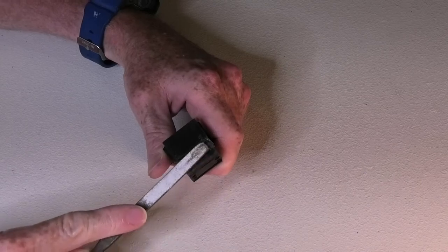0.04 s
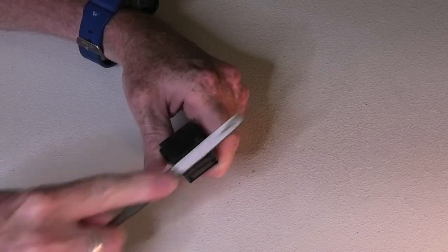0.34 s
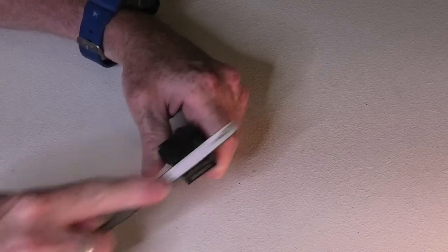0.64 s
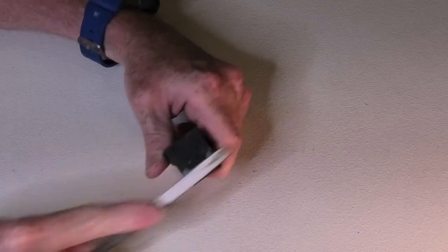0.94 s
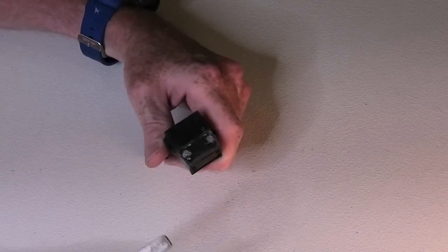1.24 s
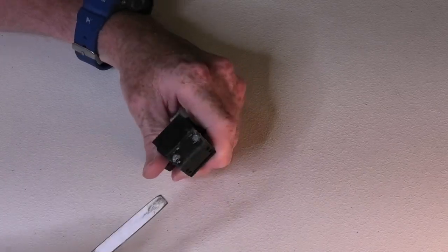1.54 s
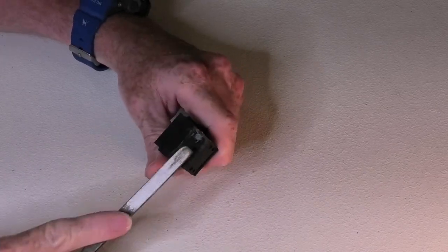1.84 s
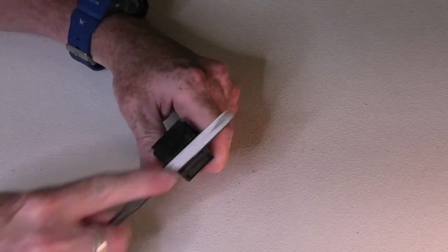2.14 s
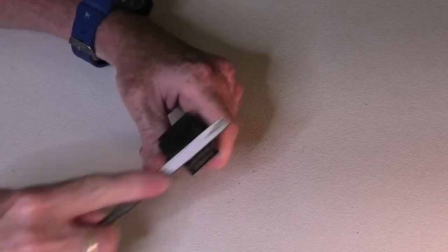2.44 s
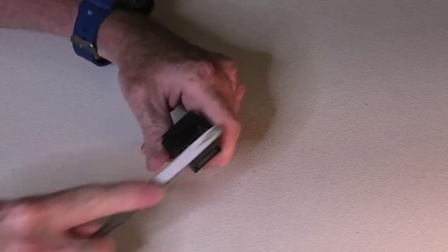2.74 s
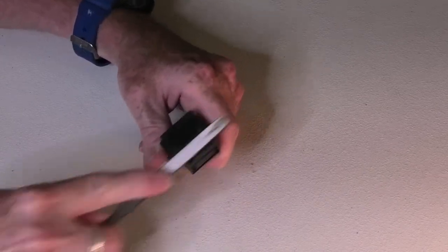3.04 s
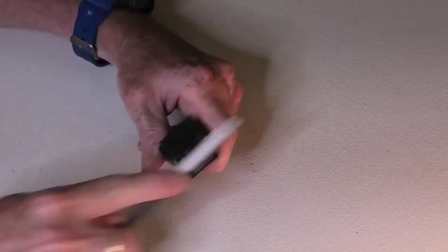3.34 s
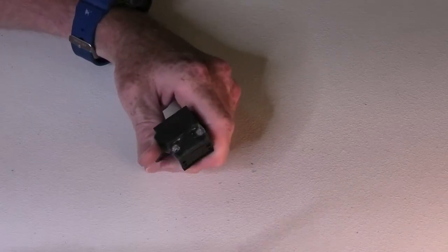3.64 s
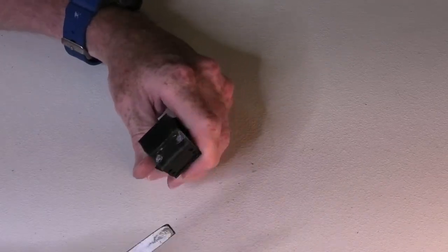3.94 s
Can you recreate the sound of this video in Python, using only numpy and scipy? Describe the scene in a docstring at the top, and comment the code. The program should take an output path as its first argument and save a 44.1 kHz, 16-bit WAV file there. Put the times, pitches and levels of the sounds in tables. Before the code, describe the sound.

Quick, scratchy file strokes on a plastic part, pausing once, with a few sharp clicks.

```python
"""Filing a plastic block

A flat metal file is worked back and forth over a small hand-held plastic block, in two bouts.
Its teeth catch at a rate that follows stroke speed, drive the resonances of block and blade and tear
off hissing chips. Now and then it knocks, and once it zips off the edge. The hand bumps the table,
the camera mount sways below hearing, and a distant engine drones through the small room's walls."""
import sys
import numpy as np
from scipy import signal
from scipy.fft import rfft, irfft, next_fast_len
from scipy.io import wavfile
from scipy.ndimage import uniform_filter1d

SR = 44100
rng = np.random.default_rng(int(sys.argv[2]) if len(sys.argv) > 2 else 0)


def wav_out(sig):
    """Save sig, one row per channel (or a flat mono array), as 16-bit PCM at SR to the path in sys.argv[1]."""
    wavfile.write(sys.argv[1], SR, np.round(np.clip(np.atleast_2d(sig).T, -1, 1) * 32767).astype(np.int16))


N = 176400

# file strokes: start_s, length_s, ring_db, hollow_db, hiss_db, buzz_db, top_tooth_hz, tilt_db_per_octave
FILE_STROKES = [(0.176, 0.15, -41, -49.5, -46, -42.5, 2696, -6),
                (0.373, 0.1, -34.5, -50, -39, -36, 2605, 3), (0.509, 0.095, -31, -55, -40, -32, 2942, -5),
                (0.662, 0.092, -31.5, -46, -34.5, -32.5, 2554, 3.5),
                (0.804, 0.098, -36.5, -49, -42.5, -38.5, 2905, -2),
                (0.95, 0.084, -44, -44, -45, -44, 1485, 3), (0.986, 0.09, -46.5, -51, -41, -52, 1505, -1),
                (2.107, 0.16, -49.5, -52.5, -47.5, -45, 2596, -11),
                (2.324, 0.099, -48, -39, -50.5, -40, 1478, -8),
                (2.468, 0.093, -44.5, -46, -45, -41, 2860, -6),
                (2.619, .1, -38.5, -45, -41.5, -42, 2201, -4),
                (2.785, 0.096, -41, -61, -42.5, -42.5, 2843, 10),
                (2.922, 0.1, -43.5, -43, -45, -41, 1702, -6), (3.064, 0.11, -46, -64, -41, -46, 2800, -7),
                (3.209, 0.1, -37, -47.5, -37, -37.5, 2408, 12),
                (3.353, 0.11, -39.5, -59, -35, -42.5, 2694, 5)]
# the file leaving the edge: time_s, tooth_rate_hz, level_db
EDGE_GLIDE = [(.958, 430, -52), (0.970, 720, -35), (.978, 900, -30), (.992, 1450, -33), (1.009, 1753, -39),
              (1.028, 3000, -35), (1.040, 3100, -46)]
# file striking block: start_s, level_db, pitch_hz, decay_s, relative_crack_db
FILE_KNOCKS = [(0.0275, -21, 2140, 0.00029, -11), (0.0855, -25, 1980, 0.00037, -23),
               (0.5147, -18, 2740, 0.0012, -25), (0.667, -22, 2650, 0.0008, -18),
               (1.0431, -23, 2700, 0.0013, 1.5), (1.059, -32, 910, 0.0021, -11),
               (1.9733, -28, 2500, 0.00034, -23), (2.576, -40, 560, .005, -25),
               (2.6408, -15, 2480, 0.0006, -13.5), (2.7955, -29, 1340, 0.0013, -20),
               (3.086, -28, 2300, 0.0014, -5), (3.2301, -5.5, 2610, 0.00089, -20),
               (3.368, -25.5, 2550, 0.0017, -21), (3.476, -39, 860, 0.0013, -26),
               (3.5007, -34, 2950, 0.0062, -12), (3.5216, -35, 1380, 0.0013, -37),
               (3.615, -55, 6530, 0.0015, 6)]
# hand striking table: start_s, level_db, pitch_hz, decay_s
TABLE_BUMPS = [(0.816, -29, 76, 0.018), (1.233, -43, 230, 0.0098), (2.79, -30.5, 127, 0.014),
               (3.426, -19.5, 89, 0.014), (3.472, -22, 92, .03), (3.486, -15, 186.5, 0.0047),
               (3.489, -35.5, 354, 0.0087), (3.505, -24.5, 86, 0.025)]
# light rubbing of file and fingers: start_s, length_s, level_db
LIGHT_RUBS = [(1.037, 0.057, -47), (1.23, 0.061, -61), (1.679, 0.34, -65), (3.425, 0.13, -55.5),
              (3.622, 0.024, -52.5), (3.82, 0.78, -47.5)]
# modes of the block's high ring, its hollow body and the steel blade: pitch_hz, bandwidth_hz, gain_db
RING_MODES = [(1875, 172, -3.5), (2230, 186, -6.5), (2720, 214, -1), (2883, 190, 1), (3210, 230, -13.5)]
HOLLOW_MODES = [(620, 570, -8), (852, 150, 6.5), (1280, 260, -1.5), (1465, 580, 9.5), (1634, 530, 13)]
BLADE_MODES = [(3260, 56, 6.5), (4230, 84, 11), (4470, 94, 5.5), (5800, 340, 1.5), (6970, 58, 1.5),
               (7410, 90, 4), (8600, 72, -7), (8480, 30, -0.5), (10100, 50, -3)]
# engine speed and load: time_s, firing_hz, drone_db, tilt_db_per_octave
ENGINE_LOAD = [(0, 37.4, 0, -9), (.48, 37.5, 0, -9), (.75, 40, -3, -3), (1.02, 43.3, -5, -3),
               (1.3, 45, -5, -3), (1.55, 46.2, 0, 0), (2.2, 47.7, 2, 0), (2.6, 48.5, -1, -4),
               (2.9, 46, 1, -1), (3.12, 43.4, 0, -2), (3.6, 43.5, 0, 2), (4, 44.3, 1, 3)]
# engine harmonics as the walls pass them: frequency_hz, level_db
WALL_TRANSMISSION = [(72, -59), (88, -50.5), (112, -38.5), (130, -42.5), (142, -54.5), (160, -51),
                     (176, -54), (189, -46), (220, -51), (237, -49.5), (263, -53), (285, -69), (307, -63),
                     (350, -75), (393, -62.5), (430, -74.5), (484, -70), (600, -78.5)]
# envelopes of the camera mount's sway and rumble: time_s, level_db
SWAY_ENVELOPE = [(0.0, -27.5), (0.86, -4), (1.53, -18.5), (2.21, -17.5), (2.26, -28), (2.46, -8.5),
                 (3.1, -7), (3.23, -15), (3.4, -4.5), (4.0, -14)]
RUMBLE_ENVELOPE = [(0, -30.5), (.5, -38), (.85, -32.5), (1.25, -36), (1.45, -52), (1.95, -49), (2.3, -42),
                   (2.55, -29), (3.05, -32), (3.45, -25.5), (3.7, -37), (4, -62)]
# spectral envelopes of the sources: frequency_hz, gain_db
BUZZ_SPECTRUM = [(300, -20), (780, 3), (1100, -7), (1500, 0), (2900, 7), (3700, -7), (6000, -15.5),
                 (9000, -13), (15000, -32)]
HISS_SPECTRUM = [(300, -4.5), (700, 8), (2000, 7.5), (3100, 16), (3750, 1.5), (4400, -1.5), (5300, -1),
                 (5900, -8.5), (7000, -3), (8200, -0.5), (10500, -6.5), (13000, -15.5), (15500, -13.5)]
ZIP_SPECTRUM = [(500, 0.5), (850, 10), (1500, 6), (3000, -1), (3700, -2.5), (5000, -2), (5900, -7),
                (7000, -33), (15000, -37)]
RUB_SPECTRUM = [(300, 2), (1000, 3), (3000, 12.5), (4500, 3), (6000, 0), (9000, -8.5), (15000, -15)]
RUMBLE_SPECTRUM = [(10, -41), (20, 0), (27, 0.5), (36, 0), (50, -17.5), (70, -15), (100, -15), (200, -32.5),
                   (600, -52), (3000, -100)]
EXHAUST_SPECTRUM = [(40, 2), (100, 2.5), (250, -5), (400, -13), (700, -21.5), (2000, -29), (15000, -58)]
AIR_SPECTRUM = [(60, -7), (110, 12.5), (250, 12), (450, -1), (700, 4.5), (880, 4), (1020, 8.5), (1200, 0),
                (1500, -4.5), (2200, -8.5), (3200, -4.5), (3800, -7), (4300, -3.5), (5200, -22),
                (9000, -23), (15500, -28)]


def filing():
    """Forced vibration: tooth impacts buzz at their catch rate and, with the chips, drive the block."""
    out, n = np.zeros(N), SR // 4
    judder_hz, chatter_hz, chatter_db, hollow_fade_db = 170, 226, 2.5, -19
    for start, length, ring_db, hollow_db, hiss_db, buzz_db, tooth_hz, tilt_db in FILE_STROKES:
        progress = np.minimum(np.arange(n) / SR / length, 1)
        speed = np.sin(np.pi * progress ** .88).clip(0)
        judder = np.exp(.14 * wander(judder_hz, n))  # the file sticks and slips
        bite = teeth(tooth_hz * judder * speed, jitter=.16)
        chatter = undb(chatter_db * np.tanh(wander(chatter_hz, n)))
        ring_force = (bite + chips(n)) * chatter * speed ** 2.16
        buzz = unit(colour(bite * chatter, BUZZ_SPECTRUM) * speed ** 1.9)
        hiss = chip_hiss(bite, chatter, speed)
        ring = unit(resonate(ring_force, contact_modes(RING_MODES, tilt_db)))
        # the hollow body speaks first, the higher ring later
        hollow_force = (bite + chips(n)) * speed ** 1.55 * undb(hollow_fade_db * progress)
        hollow = unit(resonate(hollow_force, contact_modes(HOLLOW_MODES, tilt_db)))
        block = undb(ring_db) * ring + undb(hollow_db) * hollow
        stroke = block + undb(hiss_db) * hiss + undb(buzz_db) * buzz
        add(out, start, stroke * np.sqrt(length * SR / n))  # levels are rms over the stroke's length
    return out


def teeth(rate_hz, jitter, scatter_db=4):
    """A quasi-periodic pulse train: each tooth catches once, uneven in spacing and depth."""
    spacing, depth = rng.standard_normal((1024, 2)).T
    teeth_passed = np.cumsum(rate_hz) / SR
    positions = np.cumsum(np.exp(jitter * spacing))
    reached = positions < teeth_passed[-1]
    onsets = np.interp(positions[reached], teeth_passed, np.arange(len(rate_hz))).astype(int)
    return unit(np.bincount(onsets, undb(scatter_db * depth[reached].clip(-2, 1)), len(rate_hz)))


def chips(size, rate_hz=4500, scatter_db=4):
    """Shot noise: tiny fractures occur independently, a few much stronger than the rest."""
    chance, sign = rng.random(size), rng.choice([-1, 1], size)
    strength = np.minimum(rng.exponential(size=size), 3)
    return unit((chance < rate_hz / SR) * sign * undb(scatter_db * strength))


def chip_hiss(bite, chatter, speed):
    """Amplitude-modulated noise: tearing chips hiss in step with the teeth and ring the blade."""
    n, grit_hz, treble_hz, blade_db = len(speed), 520, 11800, -9
    tooth_gate = 1 + .17 * unit(uniform_filter1d(bite, size=8))
    noise = rng.standard_normal(n) + chips(n)
    grit = undb(3 * np.tanh(wander(grit_hz, n)))
    tearing = noise * tooth_gate * chatter * grit * speed ** .93
    dull = butterworth(tearing, 4, treble_hz)
    treble = speed * butterworth(tearing, 4, treble_hz, "high")  # brightest at full speed
    spectrum = [(hz, db + rng.uniform(-3, 3)) for hz, db in HISS_SPECTRUM]
    hiss = unit(colour(dull + treble, spectrum))
    blade = unit(resonate(tearing, contact_modes(BLADE_MODES, tilt_db=0)))
    return unit(hiss + undb(blade_db) * blade)


def contact_modes(modes, tilt_db, detune=.013, scatter_db=4.5):
    """Modal coupling: each contact point tilts, detunes and reweights the resonances."""
    middle_hz = np.mean([mode[0] for mode in modes])
    return [(hz * (1 + detune * rng.uniform(-1, 1)), width,
             db + tilt_db * np.log2(hz / middle_hz) + scatter_db * rng.uniform(-1, 1))
            for hz, width, db in modes]


def resonate(force, modes):
    """Modal superposition: resonators of alternating sign add, and a band-pass darkens their skirts."""
    motion = sum((-1) ** k * undb(db) * signal.lfilter(*signal.iirpeak(hz, hz / width, fs=SR), force)
                 for k, (hz, width, db) in enumerate(modes))
    return butterworth(motion, 2, [modes[0][0] * .56, modes[-1][0] * .95], "band")


def edge_zip():
    """Repetition pitch: a zip rises as the teeth are pulled ever faster over the edge."""
    when, hz, db = np.array(EDGE_GLIDE).T
    out, t = np.zeros(N), np.arange(when[0], when[-1], 1 / SR)
    bite = teeth(np.interp(t, when, hz), jitter=.11)
    rasp = colour(bite - bite.mean(), ZIP_SPECTRUM)
    running_power = abs(uniform_filter1d(rasp ** 2, size=512)) + 1e-4 * np.mean(rasp ** 2)
    add(out, when[0], undb(np.interp(t, when, db)) * rasp / np.sqrt(running_power + 1e-18))
    return out


def knocks(attack_s=.0001, ring_db=-9):
    """Impact excitation: the file lands or snags, giving a damped note, a crack and a brief ring."""
    out, t = np.zeros(N), np.arange(SR // 20) / SR
    for start, db, hz, decay, crack_db in FILE_KNOCKS:
        envelope = (1 - np.exp(-t / attack_s)) ** 2 * np.exp(-t / decay)
        envelope /= envelope.max()
        note = envelope * np.sin(2 * np.pi * hz * t)
        ring = resonate(envelope * rng.standard_normal(len(t)), RING_MODES)
        ring /= abs(ring).max()
        crack = colour(envelope * rng.standard_normal(len(t)), HISS_SPECTRUM)
        add(out, start, undb(db) * (note + undb(ring_db) * ring + undb(crack_db) * crack))
    return out


def handling(attack_s=.00073):
    """Damped vibration and friction: the hand bumps the table; fingers and file rub faintly."""
    out, t = np.zeros(N), np.arange(SR // 4) / SR
    for start, db, hz, decay in TABLE_BUMPS:
        envelope = (1 - np.exp(-t / attack_s)) * np.exp(-t / decay)
        thud = unit(butterworth(rng.standard_normal(len(t)), 2, 350))
        add(out, start, undb(db) * envelope * (np.sin(2 * np.pi * hz * t) + .18 * thud))
    for start, length, db in LIGHT_RUBS:
        n = int(length * SR)
        swell = np.sin(np.linspace(0, np.pi, n))
        add(out, start, undb(db) * unit(colour(chips(n), RUB_SPECTRUM) * swell))
    return out


def mount_sway(t, sway_hz=9.8):
    """Infrasonic oscillation: the camera mount, shaken by the filing, sways with a low rumble."""
    phase = 2 * np.pi * np.cumsum(sway_hz * (1 + .06 * wander(1.222, N))) / SR
    sway_gain = undb(np.interp(t, *np.array(SWAY_ENVELOPE).T))
    rumble_gain = undb(np.interp(t, *np.array(RUMBLE_ENVELOPE).T))
    return sway_gain * np.sin(phase) + rumble_gain * steady_noise(RUMBLE_SPECTRUM)


def engine(t):
    """Selective transmission: the walls favour some harmonics of a distant engine's firing rate."""
    firing_hz, drone_db, tilt_db = (np.interp(t, np.array(ENGINE_LOAD)[:, 0], column)
                                    for column in np.array(ENGINE_LOAD).T[1:])
    firing_hz *= 1 + .0027 * wander(9.32, N)
    phase = 2 * np.pi * np.cumsum(firing_hz) / SR
    drone = np.zeros(N)
    for k in range(2, 13):
        db = np.interp(k * firing_hz, *np.array(WALL_TRANSMISSION).T)
        db += tilt_db * max(np.log2(k / 3), 0)  # the tilt acts above the third harmonic
        db += 1.97 * wander(4.495, N)
        drone += undb(db) * np.sin(k * phase + 2 * np.pi * rng.random())
    exhaust = undb(-48.5 + .23 * tilt_db) * steady_noise(EXHAUST_SPECTRUM)  # grows with brightness
    return np.sqrt(2) * drone * undb(drone_db) + exhaust


def room(x, low_t60_s=.25, high_t60_s=.17, crossover_hz=4500):
    """Reverberation: early reflections from table and hands precede a short diffuse tail."""
    t = np.arange(SR // 2) / SR
    low = butterworth(rng.standard_normal(len(t)), 2, crossover_hz) * undb(-60 * t / low_t60_s)
    high = butterworth(rng.standard_normal(len(t)), 2, crossover_hz, "high") * undb(-60 * t / high_t60_s)
    tail = (low + .83 * high) * (1 - np.exp(-t / .031))
    response = undb(-16) * tail / np.sqrt(np.sum(tail ** 2))
    for lag, strength in rng.random(size=(6, 2)):
        add(response, .0005 + .007 * lag, undb(-6.5) * np.array([strength - .5]))
    return x + signal.fftconvolve(x, response)[:N]


def steady_noise(spectrum):
    """Spectrally shaped Gaussian noise at rms 1."""
    return unit(colour(rng.standard_normal(N), spectrum))


def colour(x, spectrum):
    """Zero-phase filtering by gains interpolated over log frequency."""
    hz, db = np.array(spectrum, float).T
    size = next_fast_len(2 * len(x))
    bin_hz = np.arange(size // 2 + 1) * SR / size
    gain = undb(np.interp(np.log(bin_hz + 1), np.log(hz), db))
    return irfft(rfft(x, size) * gain, size)[:len(x)]


def butterworth(x, order, cutoff_hz, kind="low"):
    """Filtering with a maximally flat passband."""
    return signal.sosfilt(signal.butter(order, cutoff_hz, kind, fs=SR, output="sos"), x)


def wander(rate_hz, size):
    """Smooth random modulation with a spread near 1."""
    hold = max(int(SR / rate_hz), 1)
    return uniform_filter1d(np.repeat(rng.standard_normal(size // hold + 1), hold), hold)[:size]


def undb(db):
    """Decibels to amplitude ratio."""
    return 10 ** (np.asarray(db) / 20)


def unit(x):
    """Normalisation to rms 1."""
    return x / np.sqrt(np.mean(x ** 2) + 1e-18)


def add(out, start_s, x):
    """Superposition of x from a given time on."""
    i = int(np.clip(start_s * SR, 0, N - 1))
    out[i:i + len(x)] += x[:N - i]


def scene(air_db=-52.5):
    """Linear superposition: the work and its reverberation over engine, mount sway and room air."""
    t = np.arange(N) / SR
    air = undb(air_db) * steady_noise(AIR_SPECTRUM)
    work = filing() + edge_zip() + knocks() + handling()
    return (room(work) + engine(t) + mount_sway(t) + air)[None]


def record(dry):
    """Band limiting: a steep low-pass removes the treble above 15750 Hz."""
    return signal.sosfilt(signal.ellip(10, .1, 80, 15750, fs=SR, output="sos"), dry)


dry = scene()
out = record(dry)
wav_out(out)
```